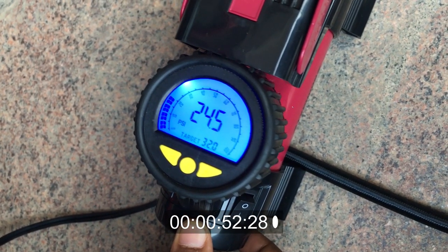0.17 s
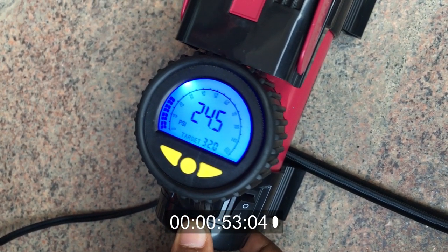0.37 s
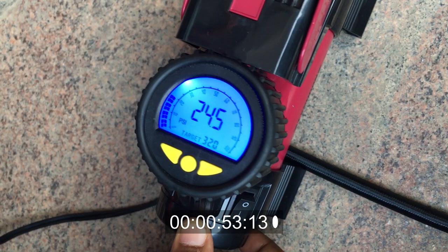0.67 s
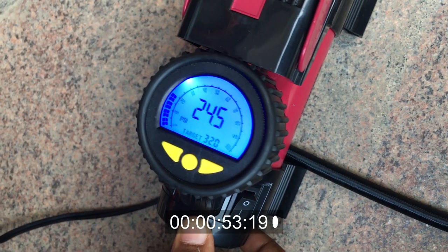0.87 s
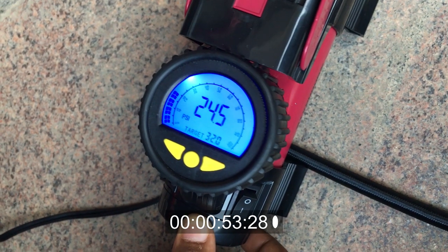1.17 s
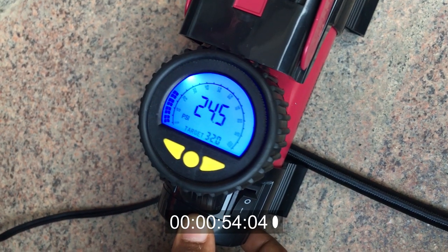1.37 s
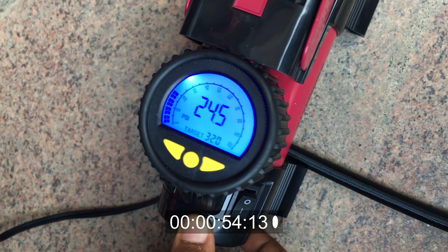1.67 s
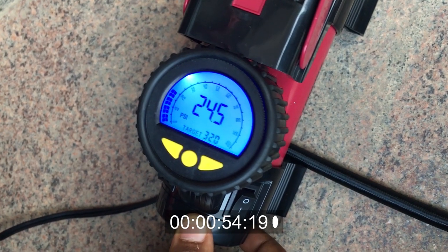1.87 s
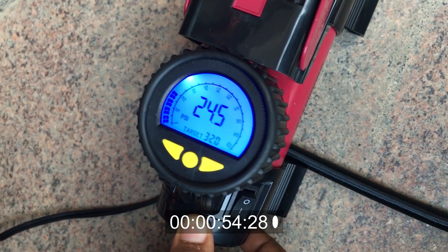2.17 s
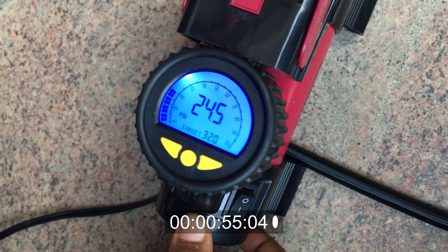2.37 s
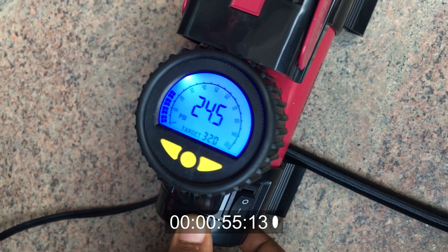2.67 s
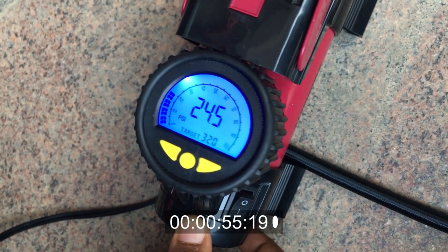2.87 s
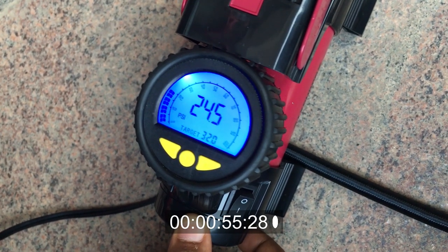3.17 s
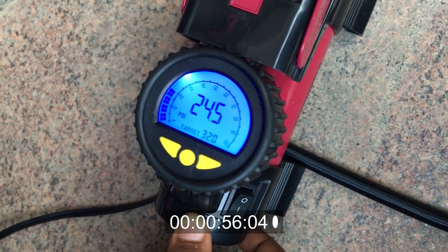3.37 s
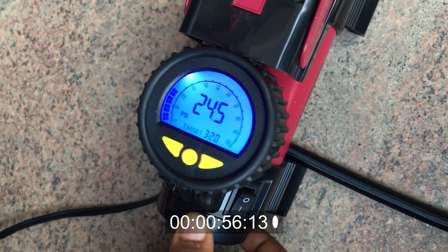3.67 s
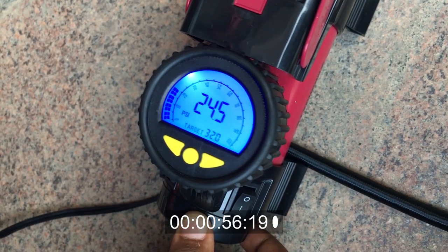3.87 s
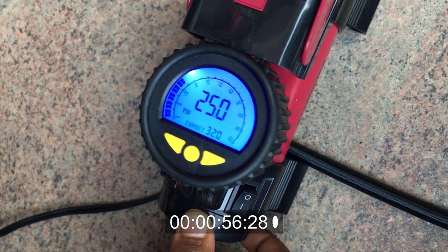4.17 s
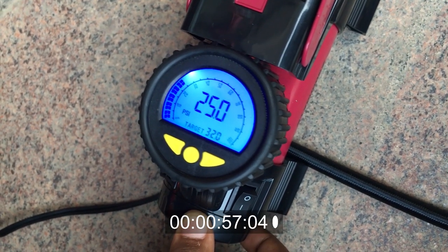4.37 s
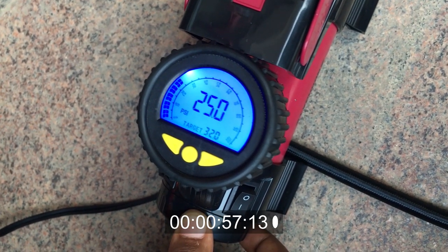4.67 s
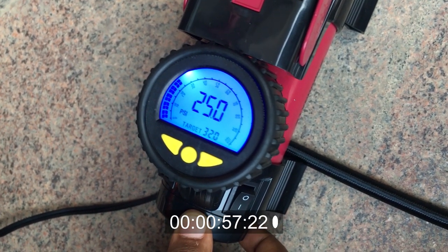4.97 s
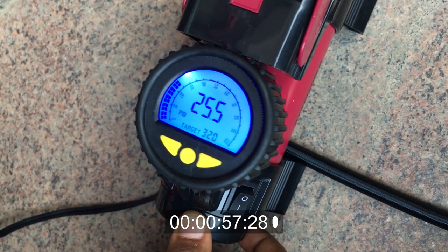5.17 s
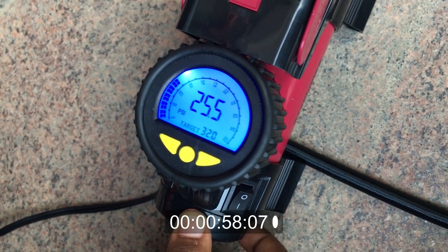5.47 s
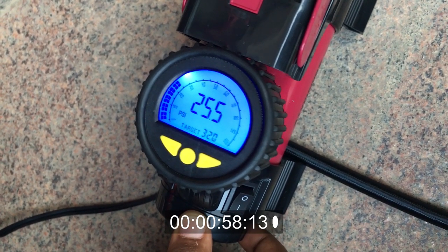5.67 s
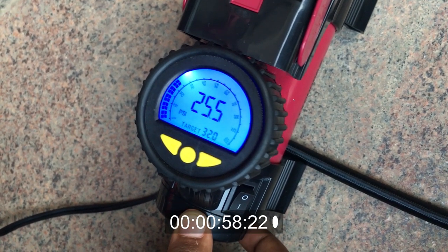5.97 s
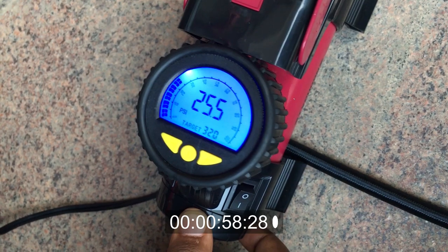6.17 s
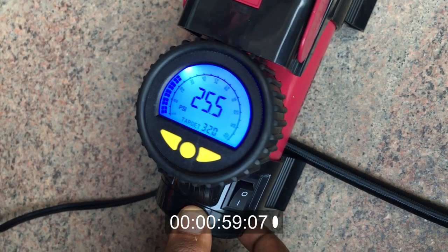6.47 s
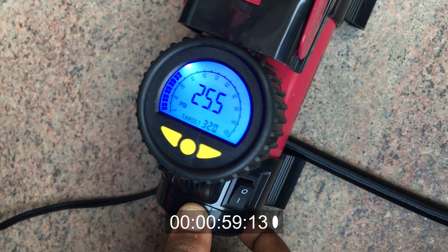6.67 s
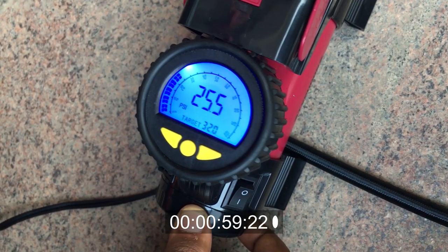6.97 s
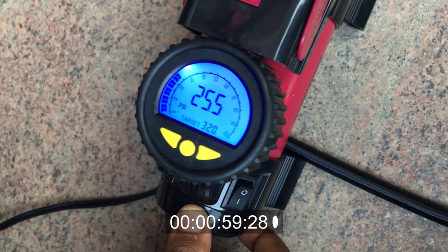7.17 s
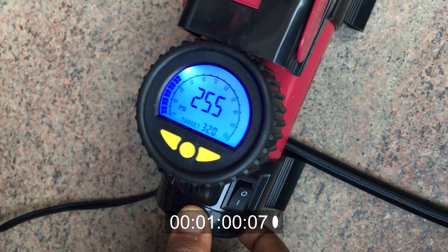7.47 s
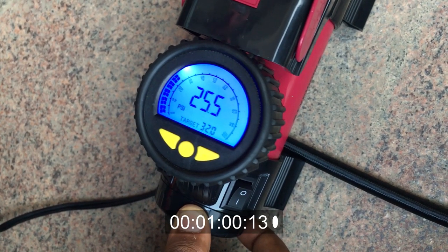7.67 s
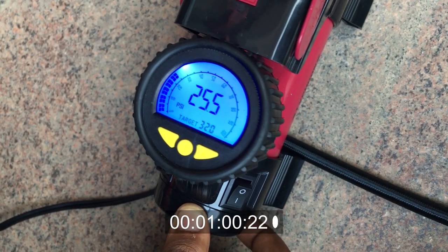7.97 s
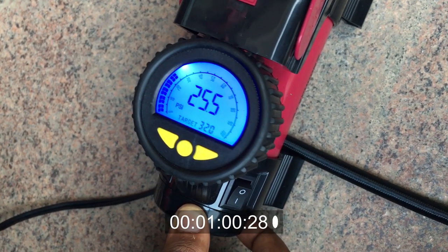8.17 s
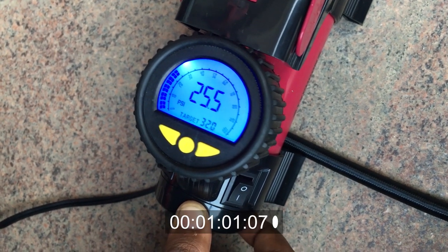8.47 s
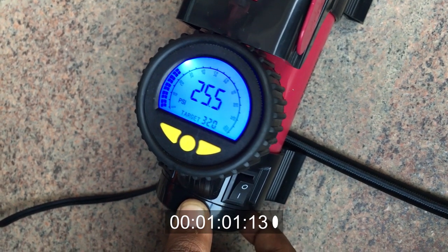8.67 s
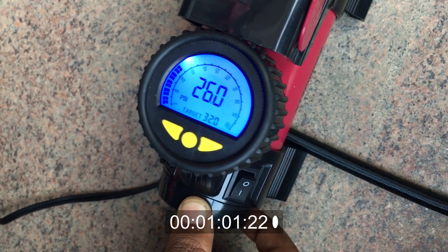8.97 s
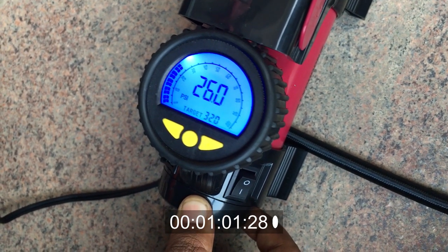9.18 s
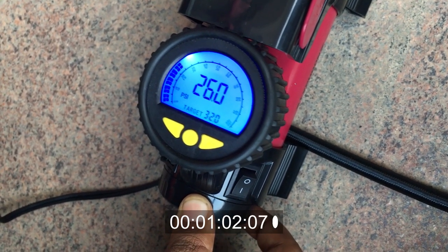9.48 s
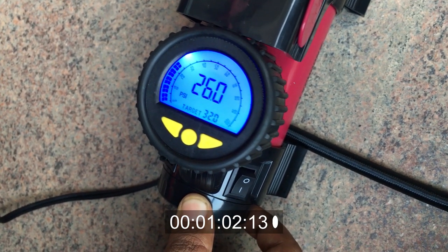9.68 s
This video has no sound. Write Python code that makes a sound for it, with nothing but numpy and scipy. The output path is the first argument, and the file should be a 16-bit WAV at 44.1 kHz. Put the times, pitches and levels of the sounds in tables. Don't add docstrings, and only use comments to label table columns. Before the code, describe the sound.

Close, relentless drone of a little tyre pump, its rapid thumps blurring into a harsh buzz with uneven valve rattle and bright hiss.

```python
import sys
import numpy as np
from scipy import signal
from scipy.fft import rfft, irfft
from scipy.io import wavfile
from scipy.ndimage import uniform_filter1d

SR = 44100
rng = np.random.default_rng(int(sys.argv[2]) if len(sys.argv) > 2 else 0)


def to_wav(s):
    ch = np.atleast_2d(s).T
    pcm = np.round(np.clip(ch, -1, 1) * 32767)
    wavfile.write(sys.argv[1], SR, pcm.astype(np.int16))


def invert_db(x):
    u = np.asarray(x, float) / 20
    return 10 ** u


N = 433503
TURNS_PER_S = 55.74


def rms_one(x):
    return x / np.sqrt(np.mean(x ** 2) + 1e-20)


def drift(rate_hz):
    points = rng.standard_normal(int(N / SR * 40) + 2)
    position = np.arange(N) / SR * np.minimum(rate_hz, 39)
    return np.interp(position, np.arange(len(points)), points)


def ring(clicks, hz, t60):
    radius = invert_db(-60 / (t60 * SR))
    w = 2 * np.pi * hz / SR
    return signal.lfilter([0, np.sin(w)], [1, -2 * radius * np.cos(w), radius ** 2], clicks + 1e-18)


def resonate(x, hz, width_hz):
    radius = np.exp(-np.pi * width_hz / SR)
    edge = (1 - radius ** 2) / 2
    poles = [1, -2 * radius * np.cos(2 * np.pi * hz / SR), radius ** 2]
    return signal.lfilter([edge, 0, -edge], poles, x)


def strikes(angle, turns, sizes):
    at = np.interp(turns, angle, np.arange(N), left=N, right=N)
    whole = at.astype(int)
    part = at - whole
    shared = np.bincount(np.r_[whole, whole + 1], np.r_[sizes * (1 - part), sizes * part], N + 2)
    return shared[:N]


# time_s, lead_turns
CRANK_LEAD = [(0, .099), (.42, .133), (.72, .118), (1.07, .121), (1.35, .177), (2.0, .228), (2.85, .226),
              (3.8, .181), (4.25, .128), (4.85, .02), (5.25, -.002), (5.68, -.001), (6.1, .07),
              (6.55, .114), (7.1, .107), (7.8, .09), (8.25, .097), (9.83, .048)]


def crank():
    s = np.arange(N) / SR
    lead = uniform_filter1d(np.interp(s, *np.transpose(CRANK_LEAD)), size=2000)
    return TURNS_PER_S * s + lead


def turn_times(angle):
    closing = np.arange(int(angle[-1]) + 1) + .84
    return np.interp(closing, angle, np.arange(N) / SR)


# start_s, length_turns
FLUTTER_SPELLS = [(.346, 4), (.453, 9), (1.01, 5), (1.206, 3), (1.511, 4), (1.69, 5), (1.869, 7),
                  (2.192, 7), (2.569, 3), (2.712, 3), (2.802, 4), (3.161, 3), (3.269, 8), (3.7, 11),
                  (3.969, 3), (4.077, 15), (4.635, 16), (4.958, 5), (5.102, 5), (5.21, 10), (5.479, 4),
                  (5.766, 2), (6.016, 2), (6.088, 7), (6.751, 23), (7.397, 7), (7.953, 1), (8.222, 1),
                  (8.348, 2), (9.156, 6)]
# time_s, chance_per_turn
STRAY_CHANCE = [(0, .4), (3.4, .33), (5.6, .14), (6.6, .2), (7.7, 0), (8.4, .05), (8.7, .1), (9.1, .15),
                (9.83, .3)]


def misses(times):
    spell = np.zeros(len(times), bool)
    for start, turns in FLUTTER_SPELLS:
        spell |= (times > start) & (times < start + turns / TURNS_PER_S)
    stray = rng.random(len(times)) < np.interp(times, *np.transpose(STRAY_CHANCE))
    return 1. * (spell | stray)


# turn_rate_multiple, level_db (rms), crest_angle_turns
SHAKE_ORDERS = [
    (1, -35.2, .018),
    (2, -34.8, .136),
    (3, -44.2, .219),
]
# angle_turns, mode_hz, t60_s, signed_strength
CASING_BLOWS = [(-.009, 257.4, .039, -.308), (.089, 289, .013, -.668), (-.048, 476.9, .15, -.19),
                (.088, 569, .079, .167), (.916, 631.6, .11, .071), (.804, 987.9, .008, .151),
                (.775, 1084.2, .055, -.036)]


def casing(angle, slip, miss):
    out = 0
    for order, db, at in SHAKE_ORDERS:
        out = out + np.sqrt(2) * invert_db(db) * np.cos(2 * np.pi * order * (angle - at))
    turn = np.clip(angle - .66, 0, None).astype(int)
    late = uniform_filter1d(slip[turn], size=40)
    missed = uniform_filter1d(miss[turn], size=40)
    play = (.0026 + .0018 * miss) * rng.standard_normal(len(miss))
    piston = angle + np.interp(angle, np.arange(len(miss)) + 0.34, play)
    seat = angle - 0.14 * late
    groups = [(piston, invert_db(0.21), range(4, 13)),
              (seat, invert_db(2.0 - 2.7 * missed), range(13, 19)),
              (seat, invert_db(0.0 + 2.8 * missed), range(19, 21)),
              (seat, invert_db(-9 + 10 * missed), range(21, 23))]
    at, hz, t60, size = np.transpose(CASING_BLOWS)
    w = 2 * np.pi * hz
    for heard, gain, orders in groups:
        for order in orders:
            s = 2j * np.pi * order * TURNS_PER_S + np.log(1000) / t60
            response = w / (s * s + w * w)
            blows = 2 * TURNS_PER_S * size * np.exp(-2j * np.pi * order * at)
            weight = np.sum(blows * response)
            out = out + gain * abs(weight) * np.cos(2 * np.pi * order * heard + np.angle(weight))
    return out


# angle_turns, mode_hz, t60_s, signed_strength
KNOCK_MODES = [(.732, 1319.7, .078, .026), (.853, 1584.1, .09, .037), (.819, 1482.9, .013, -.347),
               (.821, 1817.1, .017, .475), (.756, 1941.6, .016, .169)]
# angle_turns, spread_turns, mode_hz, t60_s, level_db, extra_on_miss_db
LOOSE_CONTACTS = [(.84, 0.0401, 1436, 0.021, -24.5, 4.5), (.86, 0.039, 1790, 0.043, -32, 7.5),
                  (.82, 0.0273, 1099, 0.02, -41.5, 17), (0.0606, 0.0504, 1600, 0.015, -22.5, -2),
                  (.4, 0.0574, 1642, 0.011, -22, -0.5), (0.14, 0.105, 570, 0.0067, -39, 2),
                  (.8, 0.028, 753, 0.0082, -46.5, 20.5)]


def valve(angle, knock_db, miss, slip, settle_db):
    turns = np.arange(len(miss))
    skew = np.clip(rng.standard_normal(len(miss)), -1.6, 1.6)
    tilt_db = 3.5 * miss * (knock_db < 1) * skew
    out = 0
    for at, hz, t60, size in KNOCK_MODES:
        blow = size * invert_db(knock_db + tilt_db * np.sign(hz - 1700))
        out = out + ring(strikes(angle, turns + at + slip, blow), hz, t60)
    for at, spread, hz, t60, db, miss_db in LOOSE_CONTACTS:
        when, later, size, sign = rng.standard_normal((4, len(miss)))
        gain = invert_db(db + miss_db * miss + settle_db * (1 - miss) + 4.3 * np.minimum(size, 1.4))
        first = strikes(angle, turns + at + spread * when, gain * np.sign(sign))
        second = strikes(angle, turns + at + spread * later, gain * np.sign(when))
        pair = ring(first, hz, t60) + ring(second, hz * 1.045, t60)
        out = out + 1.15 * resonate(pair, hz * 1.02, hz / 3)
    out = signal.sosfilt(signal.butter(6, 2000, fs=SR, output="sos"), out)
    return signal.sosfilt(signal.butter(2, 70, "high", fs=SR, output="sos"), out)


# time_s, level_db
REED_LOOSENESS = [(0, -38.5), (1.2, -37), (1.8, -36), (2.7, -38), (4.5, -38.3), (5.4, -40), (6.0, -37.5),
                  (6.6, -39), (6.9, -36), (7.3, -38.5), (9.0, -41), (9.83, -38)]
# angle_turns, level_db
VALVE_BOUNCES = [(.775, 9), (.805, 6.5), (.87, 4), (.905, -2), (.41, -8), (.52, 0)]
# mode_hz, width_hz, level_db, loudest_flow_angle_turns, flow_depth_db, rattle_db
HEAD_MODES = [(2393, 227, -16, 0.042, 8.5, -22), (3190, 370, -26, 0.27, 9.5, -30),
              (3864, 330, -17, 0.034, 0, -28), (4374, 375, -16, 0.24, 6, -30),
              (4840, 79, -26.5, 0.28, 16.5, -30), (5410, 500, -18.5, 0.24, 1, -9),
              (6280, 310, -20.5, 0.32, 4, -10.5), (6720, 130, -17.5, .3, 1, -25),
              (7100, 390, -19.5, 0.25, 10.5, -25), (7900, 350, -17.5, 0.29, 5, -10.5),
              (8940, 300, -26, 0.42, -7, -8), (9530, 440, -24.5, 0.44, 8.5, -15),
              (9990, 290, -25, .4, 7, -7.5), (11100, 460, -26, 0.31, 11.5, -10.5),
              (12340, 520, -36, 0.27, 5, -6.5), (13100, 430, -41, .35, 4, -12),
              (14200, 420, -42, .35, 4, -11), (15400, 450, -42, .35, 4, -17),
              (15900, 250, -42, .35, -1, -11)]
HISS_DB, RATTLE_DB = -14, 19.5


def head(angle, rattle_db):
    turns = np.arange(len(rattle_db))
    ticks = 0
    for at, db in VALVE_BOUNCES:
        late, size = rng.standard_normal((2, len(turns)))
        level = invert_db(rattle_db + db + RATTLE_DB + 1.7 * size)
        ticks = ticks + strikes(angle, turns + at + 0.0051 * late, level)
    burst = signal.lfilter([1], [1, -.96], ticks) * rng.standard_normal(N)
    leak_db = np.interp(np.arange(N) / SR, *np.transpose(REED_LOOSENESS)) + 38.2
    white = rng.standard_normal((2, N))
    out = 0
    for k, (hz, width_hz, db, at, depth_db, tick_db) in enumerate(HEAD_MODES):
        stroke_db = depth_db * np.cos(2 * np.pi * (angle - at))
        flow_db = stroke_db + 1.26 * drift(38) + (hz > 10500) * 0.57 * leak_db
        hiss = invert_db(HISS_DB + db + flow_db) * white[k % 2]
        narrow = resonate(hiss + invert_db(tick_db) * burst, hz, width_hz)
        out = out + (-1) ** k * resonate(narrow, hz, 3 * width_hz)
    return out


# angle_turns, spread_turns, mode_hz, t60_s, level_db
HEAD_PINGS = [(.42, 0.0036, 3238, .018, -28), (.13, .01, 3110, 0.018, -36), (0.85, .01, 3130, 0.015, -35.5),
              (.88, 0.0024, 2400, .015, -31.5), (.015, .008, 2410, 0.028, -35),
              (.16, .012, 4404, 0.026, -41), (.37, .003, 4370, .018, -38), (.88, .01, 4370, 0.017, -43)]


def pings(angle, rattle_db):
    turns = np.arange(len(rattle_db))
    out = 0
    for at, spread, hz, t60, db in HEAD_PINGS:
        when, size = rng.standard_normal((2, len(turns)))
        blows = strikes(angle, turns + at + spread * when, invert_db(db + 2.44 * size))
        out = out + resonate(ring(blows, hz, t60), hz, width_hz=420)
    # angle in turns, Hz, dB above the rattle
    for at, hz, db in ((.8, 12240, 13.5), (.88, 12540, 10.5)):
        when = 0.0059 * rng.standard_normal(len(turns))
        blows = strikes(angle, turns + at + when, invert_db(rattle_db + db))
        out = out + resonate(ring(blows, hz, t60=0.013), hz, width_hz=1500)
    return out


IDLE_REVS_PER_S = 23.567
# time_s, lead_turns
ENGINE_LEAD = [(0, -.01), (1.2, .05), (1.7, -.023), (3.2, -.367), (4.2, -.393), (4.8, -.5), (5.7, -.493),
               (6.2, -.54), (7.7, -.613), (8.7, -.553), (9.83, -.61)]
# idle_rate_multiple, level_db (rms), lead_cycles
ENGINE_ORDERS = [
    (2, -46.5, -.277),
    (3, -39.5, .21),
    (4, -46, -.133),
]
# pitch_hz, level_db (rms), lead_cycles
CAR_HUMS = [
    (104.75, -48, -.27),
    (174.064, -39.3, .37),
]


def car():
    s = np.arange(N) / SR
    wander = uniform_filter1d(np.interp(s, *np.transpose(ENGINE_LEAD)), size=8000)
    revs = IDLE_REVS_PER_S * s + wander
    lines = [(order * revs + lead, db) for order, db, lead in ENGINE_ORDERS]
    lines += [(hz * s + lead, db) for hz, db, lead in CAR_HUMS]
    out = 0
    for cycles, db in lines:
        out = out + np.sqrt(2) * invert_db(db + 1.5 * drift(2.31)) * np.cos(2 * np.pi * cycles)
    return out


# frequency_hz, density_db (per Hz)
FLOOR_SPECTRUM = [(33, -35), (45, -6), (100, 4), (150, -4), (250, -5), (520, -2), (900, -0.5), (1250, -2),
                  (1800, 0.5), (2100, -8), (3500, -20), (16000, -21)]
FLOOR_DB = -34


def floor():
    hz = np.maximum(np.fft.rfftfreq(N, 1 / SR), 1)
    shape_hz, shape_db = np.transpose(FLOOR_SPECTRUM)
    shape = np.interp(np.log(hz), np.log(shape_hz), shape_db, left=-60)
    noise = irfft(rfft(rng.standard_normal(N)) * invert_db(shape), N)
    return invert_db(FLOOR_DB) * rms_one(noise)


def listed(level_db, times, events, lift_db):
    out = level_db.copy()
    nearest = [np.argmin(abs(times - at)) for at, db in events]
    out[nearest] = np.transpose(events)[1] + lift_db
    return out


# time_s, peak_db
HARD_KNOCKS = [(.318, 0.5), (.533, -4.5), (1.787, -3.5), (2.397, -2.5), (2.595, -3.5), (2.702, -4),
               (2.738, -1.5), (2.846, -1), (2.953, -2.5), (3.475, -1.5), (3.923, -6), (4.553, -2.5),
               (5.056, -2), (5.612, -1.5), (6.06, -6), (6.221, -3.5), (6.633, -4), (6.705, -5),
               (7.764, -2.5), (8.248, -2.5), (8.804, -4), (8.858, -4.5), (8.894, -3), (8.948, -4),
               (9.02, -2), (9.235, -2.5), (9.271, -4), (9.649, -3.5)]
# time_s, peak_db
SHARP_RATTLES = [(.945, -22), (1.338, -16), (1.517, -19), (1.553, -19), (1.714, -20), (1.786, -19),
                 (1.876, -18), (1.965, -22), (1.983, -19), (2.091, -15), (2.306, -20), (2.36, -18),
                 (2.736, -20), (2.791, -20), (2.952, -19), (3.006, -19), (3.042, -20), (3.58, -17),
                 (3.598, -23), (3.706, -19), (3.975, -21), (5.324, -18), (5.773, -22), (6.041, -23),
                 (6.095, -23), (6.202, -20), (7.457, -20), (9.198, -21), (9.234, -18), (9.736, -20)]
SETTLE_DB = 1.5


def scene():
    angle = crank()
    times = turn_times(angle)
    miss = misses(times)
    wobble, chance, scatter = rng.standard_normal((3, len(times)))

    looseness_db = np.interp(times, *np.transpose(REED_LOOSENESS))
    rattle_db = looseness_db - 9.5 + 4 * miss + np.minimum(2.6 * chance, 2.2)
    rattle_db = listed(rattle_db, times, SHARP_RATTLES, lift_db=-20.0)

    slip = .0017 * wobble + miss * np.sign(wobble) * (.005 + .012 * rng.random(len(times)))
    knock_db = -.3 - 4.5 * miss + (0.55 + 1.6 * miss) * np.minimum(scatter, 1.2)
    knock_db = listed(knock_db, times, HARD_KNOCKS, lift_db=5.5)
    settle_db = SETTLE_DB * (np.interp(times, *np.transpose(STRAY_CHANCE)) / .3 - 1)

    pump = casing(angle, slip, miss) + valve(angle, knock_db, miss, slip, settle_db)
    pump = pump + head(angle, rattle_db) + pings(angle, rattle_db)
    return (pump + car() + floor())[None]


def band_limit(x):
    return signal.sosfilt(signal.butter(12, 15860, fs=SR, output="sos"), x)


def record(dry):
    top_cut = signal.ellip(10, .05, 70, 15700, fs=SR, output="sos")
    mix = signal.sosfilt(top_cut, dry)
    return band_limit(mix)


dry = scene()
out = record(dry)
to_wav(out)
```